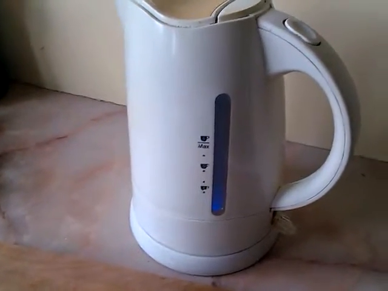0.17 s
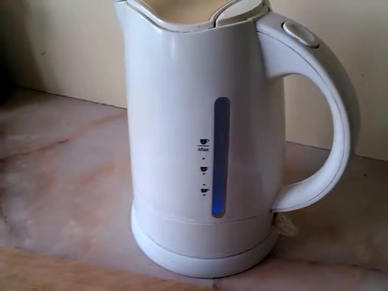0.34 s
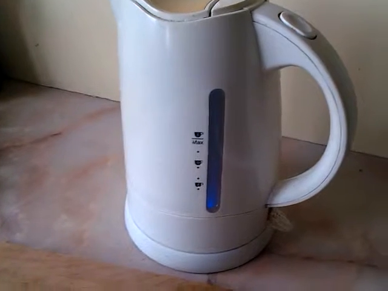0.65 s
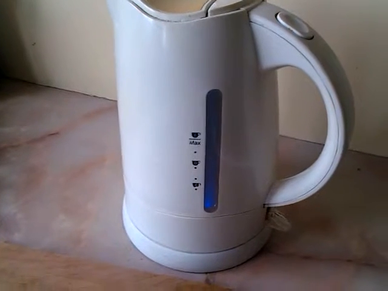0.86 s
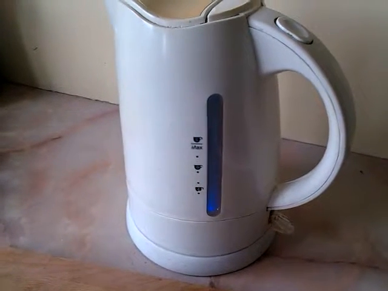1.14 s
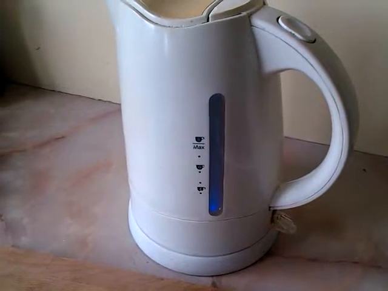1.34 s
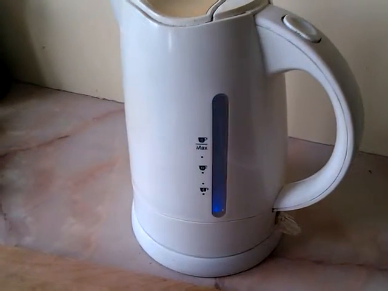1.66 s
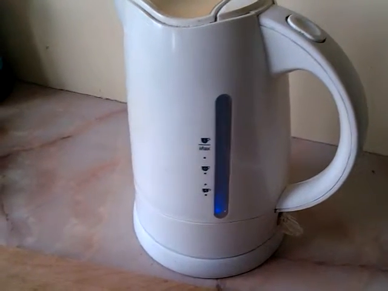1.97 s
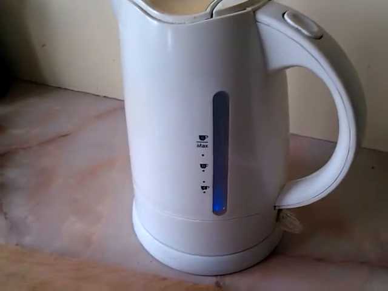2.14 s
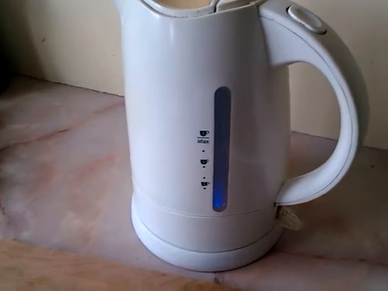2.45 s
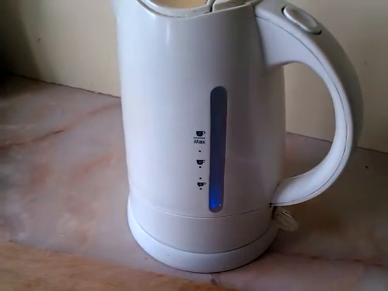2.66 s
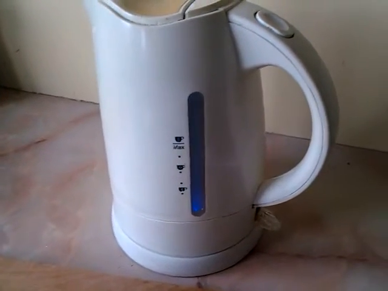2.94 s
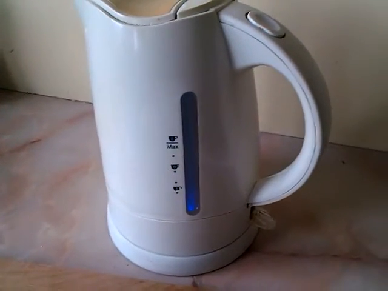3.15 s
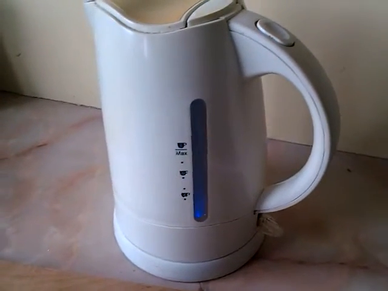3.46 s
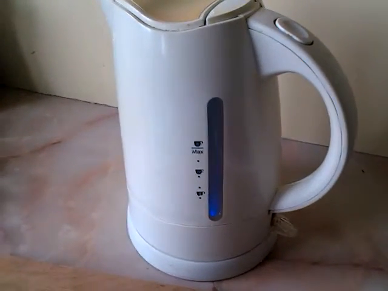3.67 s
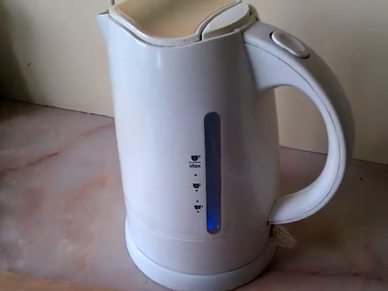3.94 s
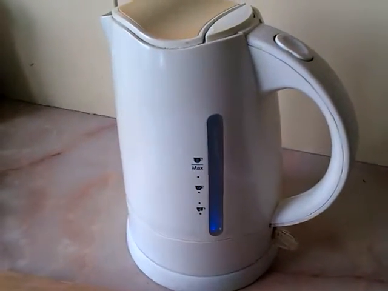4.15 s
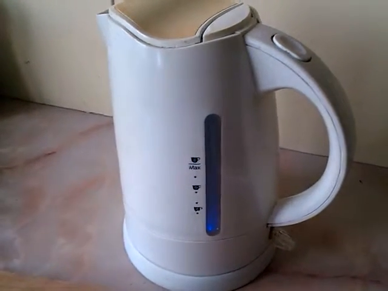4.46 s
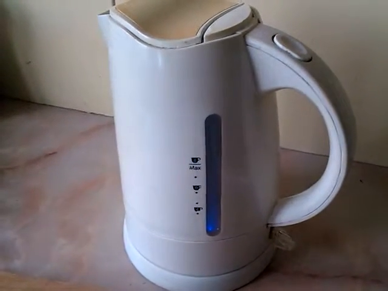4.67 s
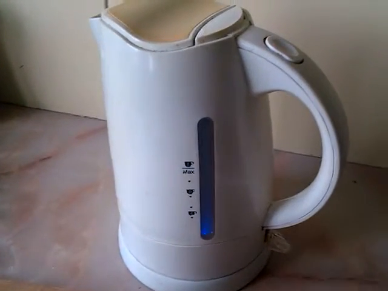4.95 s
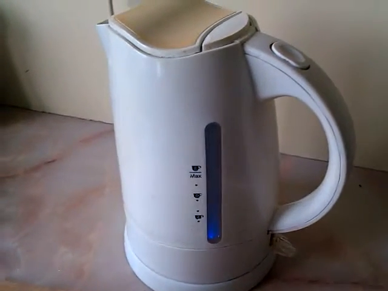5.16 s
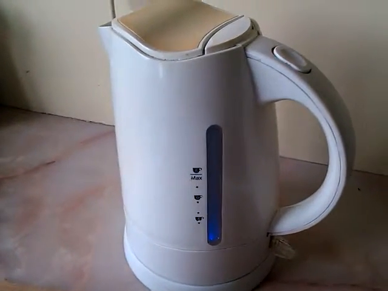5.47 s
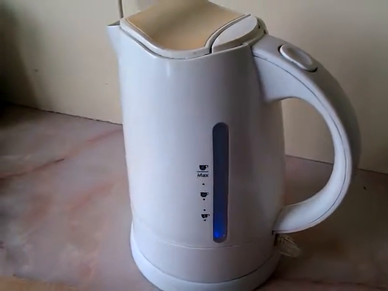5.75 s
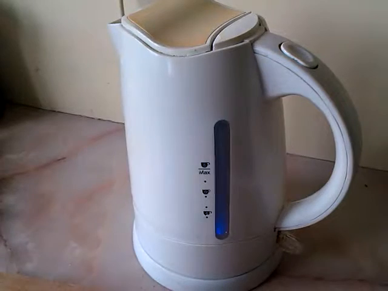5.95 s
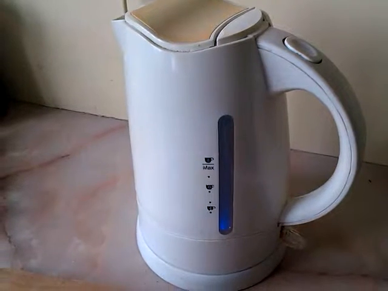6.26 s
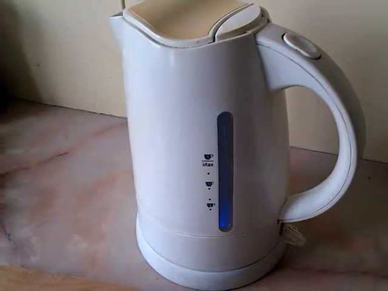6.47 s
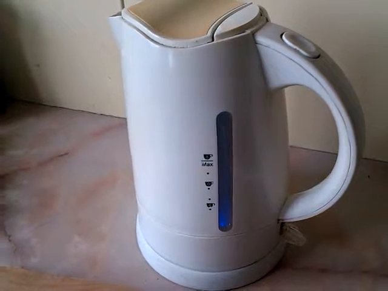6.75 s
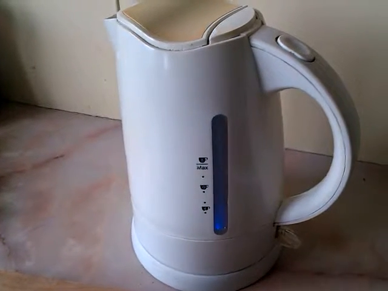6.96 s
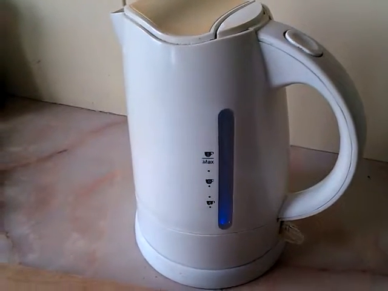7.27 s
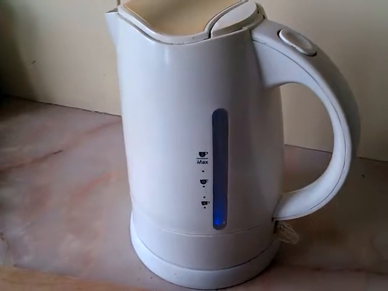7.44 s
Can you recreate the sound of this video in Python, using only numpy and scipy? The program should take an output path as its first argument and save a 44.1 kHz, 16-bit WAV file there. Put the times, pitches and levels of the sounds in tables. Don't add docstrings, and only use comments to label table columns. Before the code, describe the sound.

Close, steadily rising kettle roar with bubbly pops and low hoots, interrupted by a sharp rattling door bang and later one short hard knock.

```python
import sys
import numpy as np
from scipy import signal
from scipy.fft import rfft, irfft
from scipy.io import wavfile
from scipy.ndimage import uniform_filter1d

SR = 44100
rng = np.random.default_rng(int(sys.argv[2]) if len(sys.argv) > 2 else 0)


def level_to_linear(level):
    exponent = np.asarray(level, float) / 20
    return 10 ** exponent


def transcribe(signal):
    frames = np.atleast_2d(signal).T
    limited = np.clip(frames, -1, 1)
    pcm = np.round(limited * 32767).astype(np.int16)
    wavfile.write(sys.argv[1], SR, pcm)


N = 335601

# [f/Hz, t60/s]
KITCHEN_DECAY = [(100, 0.35), (500, 0.46), (1500, 0.13), (4000, 0.43), (9000, 0.045)]
# [f/Hz, level/dB]
PANEL_RADIATION = [(20, -34.5), (60, -23), (130, -7.5), (400, -5), (600, -1), (850, -1.5), (1300, 2),
                   (2200, 0.5), (6000, -1), (16000, -7)]
# [t/s, level/dB, contact/ms, room share/dB]
DOOR_BLOWS = [(3.59, -41.5, 1.6, -5), (3.615, -27.5, 2.1, -8), (4.876, -26, 0.36, -7),
              (5.6333, 0, 0.32, -3), (5.6358, -9, 0.13, -28.5), (5.6462, -6, 0.99, -16.5),
              (5.658, -14.5, 0.1, -9.5), (5.679, -10.5, 0.55, -5.5), (5.699, -14.5, 0.68, 8.5),
              (5.717, -27, .6, -2), (6.079, -21, 0.83, 4.5), (6.098, -15, 0.28, 0.5), (6.112, -21, 0.5, -8)]
# [f/Hz, level/dB, t60/s]
DOOR_MODES = [(180.4, -20.5, 0.055), (287, -7.5, 0.1), (416, -18.5, 0.15), (540, 1.5, 0.075),
              (611, 2, 0.13), (710, -2.5, 0.16), (773, 3, 0.099), (853, 6.5, 0.13), (897, 8, 0.085),
              (1038, 7.5, 0.073), (1113, 3.5, 0.064), (1206, -3, 0.04), (1340, -3, 0.046), (1670, -7, 0.04),
              (2240, -13, 0.014), (2700, -13.5, .02)]
# [f/Hz, level/dB, t60/s]
BOOM_MODES = [(39.7, -3.5, 0.33), (75.5, -13, 0.4), (113, -3.5, 0.71), (187.6, 5, 0.33), (260, -1.5, 0.3)]
# [t/s, level/dB, contact/ms, room share/dB]
MUG_BLOWS = [
    (7.4575, -3, 0.29, -5),
    (7.547, -17, 0.77, -1),
]
# [f/Hz, level/dB, t60/s]
MUG_MODES = [(344, -30, 0.122), (620, -22, 0.12), (1000, 0, 0.035), (1390, 7, 0.02), (1630, 2, 0.016),
             (2150, 7.5, .012), (2800, 9, .008)]
# [f/Hz, level/dB, t60/s]
TICK_MODES = [(4570, 3, .16), (6150, -1, .14), (7250, -4, .07), (6700, -8, .05), (5400, -8, .04)]
# [t/s, level/dB]
BOILING = [(0.0, -7.5), (0.3, -9), (0.8, -6), (1.7, -3.5), (2.5, -2), (3.9, -2), (4.8, -.5), (5.6, -1.5),
           (5.95, .5), (6.5, 0), (7.61, 0.55)]
# [t/s, peak level/dB, f/Hz]
BIG_BUBBLES = [(0.6463, -10.5, 2280), (0.866, -12, 2700), (1.297, -31, 2530), (1.6456, -6.5, 1240),
               (1.8979, -14.5, 2560), (2.333, -10.5, 2440), (2.608, -7.5, 2520), (3.502, -16, 1200),
               (3.8369, -5.5, 2430), (3.937, -7, 2490), (4.3968, -4.5, 1750), (4.5355, -4, 2710),
               (5.2821, -6.5, 2500), (6.1677, -13, 2400), (6.3726, -16, 1880), (6.772, -3, 1720),
               (6.9197, -4.5, 2420), (7.1962, -3, 1670)]
# [f/Hz, level per Hz/dB]
PLATE_COLOUR = [(500, -50), (850, -13.5), (938, -10), (1080, -6), (1200, -2), (1470, -4), (1590, -1.5),
                (2280, -3.5), (2470, 2.5), (3150, -16), (3400, -15), (4420, -34.5), (7480, -120)]
# [f/Hz, width/Hz, level/dB]
PLATE_RINGS = [(1167, 8.7, -11.5), (1240, 18, -9.5), (1322, 4.7, -8.5), (1416, 14, -14), (1463, 8.5, -10),
               (1552, 11, -4.5), (1619, 100, 0), (1670, 21, -8.5), (1775, 14, -11), (1917, 18, -4.5),
               (2006, 81, -5), (2025, 6.6, -6), (2140, 25, -4), (2217, 10, -7), (2420, 3.8, -17),
               (2450, 38, 0.5), (2625, 18, -0.5), (2780, 14, -16), (2900, 120, -9.5)]
# [f/Hz, level per Hz/dB]
FIZZ_COLOUR = [(1710, -36.5), (2900, 0.5), (3840, -10), (4210, -8.5), (4970, -13), (5660, -13),
               (7950, -27.5), (8390, -29), (9240, -36.5), (11000, -39), (14000, -71), (20300, -120)]
# [f/Hz, width/Hz, level/dB]
FIZZ_RINGS = [(3380, 60, -3), (5330, 30, -8.5), (5610, 27, -11)]
# [f/Hz, level per Hz/dB]
JUG_COLOUR = [(15, -41), (100, -35), (180, -32), (230, -27), (320, 2), (450, -8.5), (560, -0.5), (700, -4),
              (850, -5), (1100, -4.5), (1430, -34.5), (2400, -92.5)]
# [f/Hz, width/Hz, level/dB]
JUG_RINGS = [(177, 25, -3), (513, 19, -22.5), (604.7, 11, 3.5), (767, 54, -3), (844, 19, -2),
             (923.6, 9.5, 1), (1012, 4.4, -2)]
# [start t/s, hold/s, level above rest/dB]
LID_BURSTS = [(0.0, 0.019, 13.5), (0.72, 0.075, 7), (1.36, 0.24, 6.5), (2.15, .1, 7), (2.62, .05, 8),
              (2.95, 0.12, 5), (3.4, 0.3, 8), (4.0, 0.14, 4), (4.56, 0.11, 11), (5.3, 0.1, 4),
              (6.3, 0.21, 6), (6.8, 0.22, 6), (7.2, 0.037, 4.5)]
# [f/Hz, width/Hz, level/dB]
LID_RINGS = [(390, 7.4, 6.5), (403, 12, 2), (429.8, 4.6, -1)]
# [start t/s, hold/s, level above rest/dB]
STAND_BURSTS = [(0.42, 0.15, 11), (0.72, .3, 11.5), (1.37, .17, 10.5), (1.7, .1, 11), (1.9, .25, 14),
                (2.25, .2, 9.5), (2.58, 0.14, 13.5), (2.97, 0.31, 12), (3.36, .34, 13.5), (3.86, 0.14, -7),
                (4.19, 0.1, 13), (4.55, 0.4, 14.5), (5.0, 0.56, 11.5), (5.76, 0.21, 9.5),
                (6.65, 0.43, 14.5), (7.16, 0.1, 14)]
# [f/Hz, width/Hz, level/dB]
STAND_RINGS = [(137, 4.5, -10), (153.3, 7.3, 4)]
# [f/Hz, width/Hz, level/dB]
WHISTLE_RINGS = [(4338, 12, 0)]
# [f/Hz, width/Hz, depth/0-1]
WEAK_BANDS = [(114, 23, 0.7), (187.3, 31, 0.8), (296, 16, 0.3), (655, 20, 0.08), (1091, 45, 0.9),
              (1530, 28, 1), (2900, 23, 0)]
# [f/Hz, level/dB]
MICROPHONE = [(20, -18.5), (60, -28.5), (120, -6), (200, -3), (7500, 2.5), (9500, -1.5), (12000, -8.5),
              (20000, -41)]

PLATE_DB, PLATE_FOLLOW = -27, 1.08
FIZZ_DB, FIZZ_FOLLOW = -37.5, 0.55
JUG_DB, JUG_FOLLOW = -45.5, 1.13
WHISTLE_DB, WHISTLE_FOLLOW = -56, 2.4
LID_REST_DB, STAND_REST_DB, HOLLOW_FOLLOW = -54.5, -65, 0.54
BURST_RISE_S, BURST_FALL_S = 0.026, 0.06


def unit_level(x):
    return x / np.sqrt(np.mean(x ** 2))


def colour(x, points):
    hz, db = np.transpose(points)
    axis = np.maximum(np.fft.rfftfreq(4096, 1 / SR), 1)
    log_gain = np.interp(np.log(axis), np.log(hz), db) * np.log(10) / 20
    cepstrum = irfft(log_gain)
    cepstrum[1:2048] *= 2
    cepstrum[2049:] = 0
    return signal.fftconvolve(x, irfft(np.exp(rfft(cepstrum))))[:len(x)]


def resonance_pole(hz, width):
    return np.exp((2j * np.pi * hz - np.pi * width) / SR)


def ring(x, hz, width):
    return signal.lfilter([1], [1, -resonance_pole(hz, width)], x).imag


def notch(x, hz, width, depth):
    pole = resonance_pole(hz, width)
    band = 2 * (1 - abs(pole)) * signal.lfilter([1], [1, -pole], x).real
    return x - min(depth, 1) * band


def decay(t60, count):
    return level_to_linear(-60 * np.arange(count) / SR / t60)


def struck_modes(hit, modes):
    return sum(level_to_linear(db) * ring(hit, hz, np.log(1000) / np.pi / t60) for hz, db, t60 in modes)


def curves(table):
    s, *columns = np.transpose(table)
    return [np.interp(np.arange(N) / SR, s, column) for column in columns]


def walk(rate):
    k = int(SR / rate)
    steps = np.repeat(rng.standard_normal(N // k + 1), k)
    smooth = uniform_filter1d(uniform_filter1d(steps, k), k)
    return unit_level(smooth[:N])


def bursts(table):
    t = np.arange(N) / SR
    lifts = []
    for start, hold, db in table:
        rise = (t - start) / BURST_RISE_S + 1
        fall = (start + hold - t) / BURST_FALL_S + 1
        lifts.append(db * np.clip(np.minimum(rise, fall), 0, 1))
    return np.max(lifts, axis=0)


def house():
    rumble = level_to_linear(-76) * unit_level(ring(rng.standard_normal(N), 45, 70))
    fridge = level_to_linear(-68) * unit_level(ring(rng.standard_normal(N), 259.8, 4))
    return rumble + fridge


def room(x):
    hz, t60 = np.transpose(KITCHEN_DECAY)
    count, tail = SR, 0
    for centre in 60 * 2.0 ** np.arange(8):
        band = unit_level(ring(rng.standard_normal(count), centre, 0.41 * centre))
        fall = decay(np.interp(np.log(centre), np.log(hz), t60), count)
        tail = tail + np.sqrt(centre) * band * fall / np.sqrt(np.sum(fall ** 2))
    tail = tail * (1 - decay(0.0077, count))
    spectrum = rfft(tail)
    size = np.abs(spectrum)
    even = uniform_filter1d(size, size=500) / uniform_filter1d(size, size=40)
    tail = irfft(spectrum * even)[:count // 2]
    return signal.fftconvolve(x, tail / np.sqrt(np.sum(tail ** 2)))[:N]


def knock(contact_ms, modes, damping, rattle_db, edge_db, snap_db):
    t = np.arange(SR // 2) / SR
    count = len(t)
    push = np.exp(-0.5 * ((t - 0.002) * 1000 / (0.46 * contact_ms)) ** 2)
    gains = level_to_linear(1.5 * rng.standard_normal(len(modes)))
    body = sum(g * level_to_linear(db) * ring(push, hz, damping / t60) for g, (hz, db, t60) in zip(gains, modes))
    grit = rng.standard_normal(count) * decay(0.057, count)
    rattle = signal.fftconvolve(grit, np.gradient(push[:300]))[:count]
    click = ring(rng.standard_normal(count) * np.roll(decay(0.032, count), 88), 3800, 1700)
    snap = rng.standard_normal(count) * np.roll(decay(0.0028, count), 88)
    click += level_to_linear(snap_db) * np.abs(click).max() * snap
    click_db = edge_db - 33.5 * contact_ms
    blow = body / np.abs(body).max()
    blow += level_to_linear(rattle_db) * rattle / np.abs(rattle).max()
    return blow + level_to_linear(click_db) * click / np.abs(click).max()


def knocks(blows, modes, boom_db, **touch):
    direct, to_room, air_push = np.zeros((3, N))
    for s, db, contact_ms, room_db in blows:
        blow = knock(contact_ms, modes, **touch)
        i = int((s - 0.002) * SR)
        n = min(len(blow), N - i)
        direct[i:i + n] += level_to_linear(db) * blow[:n]
        to_room[i:i + n] += level_to_linear(db + room_db) * blow[:n]
        air_push[i] += level_to_linear(db + boom_db)
    air_push = signal.fftconvolve(air_push, np.hanning(260) / 130)[:N]
    boom = colour(struck_modes(air_push, BOOM_MODES), [(15, -28.5), (36, -2.5), (200, 1.5)])
    echo = colour(room(to_room), [(3000, -2), (7000, 11), (12000, -27)])
    return colour(direct + echo, PANEL_RADIATION) + boom


def cupboard_door():
    return knocks(DOOR_BLOWS, DOOR_MODES, boom_db=-29, damping=2.2, rattle_db=-7, edge_db=-4, snap_db=-16)


def set_down():
    return knocks(MUG_BLOWS, MUG_MODES, boom_db=-30.5, damping=2.8, rattle_db=-16.5, edge_db=-16, snap_db=6)


def tick():
    hit = np.zeros(N)
    hit[int(6.568 * SR)] = level_to_linear(-41)
    return struck_modes(hit, TICK_MODES)


def collapses(rate, spread_db):
    when, size, sign = rng.random((3, N // 4))
    count = min(int(rate * N / SR), N // 4)
    strength = level_to_linear(spread_db * np.minimum(-np.log(1 - size), 4.5)) * np.sign(sign - 0.5)
    hail = np.zeros(N)
    hail[(when[:count] * N).astype(int)] = strength[:count]
    return unit_level(hail)


def struck(points, modes, rate, spread_db, common, share, modes_db, flicker_db):
    def hail():
        return (share * common + collapses(rate, spread_db)) * level_to_linear(flicker_db * walk(12))

    broad = unit_level(colour(hail(), points))
    rings = sum(level_to_linear(db) * unit_level(ring(hail(), hz, width)) for hz, width, db in modes)
    return unit_level(broad + level_to_linear(modes_db) * unit_level(rings))


def hollow(modes, db, hail):
    twice = sum(level_to_linear(d) * unit_level(ring(ring(hail, hz, width), hz, 5 * width)) for hz, width, d in modes)
    return unit_level(twice) * level_to_linear(db)


def pops():
    out, t = np.zeros(N), np.arange(1200) / SR
    count = len(t)
    for s, db, hz in BIG_BUBBLES:
        strike = colour(rng.standard_normal(count) * decay(0.045, count), PLATE_COLOUR)
        note = np.sin(2 * np.pi * hz * t) * decay(0.037, count) * (1 - decay(0.014, count))
        i = int(s * SR)
        out[i:i + count] += level_to_linear(db - 12.5) * (note + 1.09 * strike / np.abs(strike).max())
    return out


def kettle():
    boil_db, = curves(BOILING)
    common = collapses(900, 3.7)
    plate = struck(PLATE_COLOUR, PLATE_RINGS, 1500, 1.32, common, share=0.48, modes_db=-3.5, flicker_db=1.22)
    fizz = struck(FIZZ_COLOUR, FIZZ_RINGS, 9000, 0.58, common, share=0.27, modes_db=-19.5, flicker_db=0.44)
    jug = struck(JUG_COLOUR, JUG_RINGS, 600, 2.9, common, share=0.32, modes_db=5, flicker_db=1.2)
    lid = hollow(LID_RINGS, LID_REST_DB + bursts(LID_BURSTS), common)
    stand = hollow(STAND_RINGS, STAND_REST_DB + bursts(STAND_BURSTS), common)
    whistle_db = WHISTLE_DB + WHISTLE_FOLLOW * boil_db + 1.3 * walk(5)
    out = plate * level_to_linear(PLATE_DB + PLATE_FOLLOW * boil_db)
    out += fizz * level_to_linear(FIZZ_DB + FIZZ_FOLLOW * boil_db)
    out += jug * level_to_linear(JUG_DB + JUG_FOLLOW * boil_db)
    out += (lid + stand) * level_to_linear(HOLLOW_FOLLOW * boil_db)
    out += hollow(WHISTLE_RINGS, whistle_db, common)
    for hz, width, depth in WEAK_BANDS:
        out = notch(out, hz, width, depth)
    return out + pops()


def scene():
    background = house()
    bangs = cupboard_door() + set_down()
    near = colour(kettle() + tick(), MICROPHONE)
    return (near + bangs + background)[None]


def roll_off(x):
    return signal.sosfilt(signal.butter(12, 15800, fs=SR, output="sos"), x)


def record(dry):
    knee, top = 6, 0.8
    rounded = dry / (1 + np.abs(dry / top) ** knee) ** (1 / knee)
    return roll_off(rounded)


dry = scene()
out = record(dry)
transcribe(out)
```